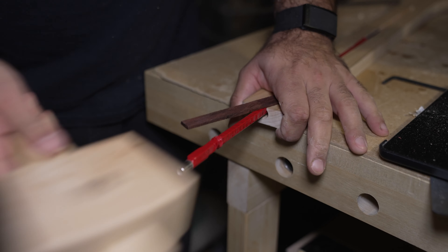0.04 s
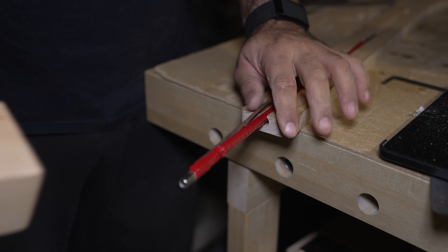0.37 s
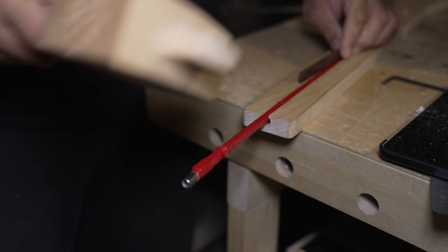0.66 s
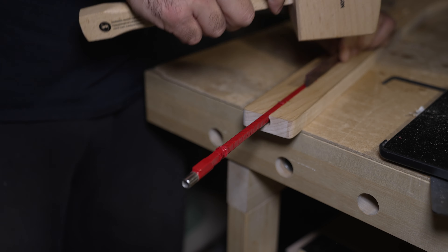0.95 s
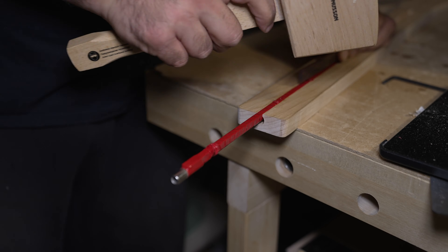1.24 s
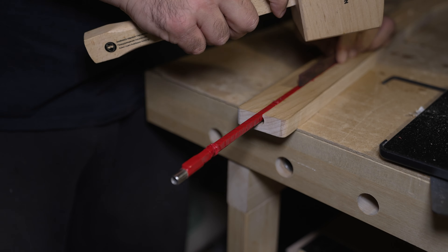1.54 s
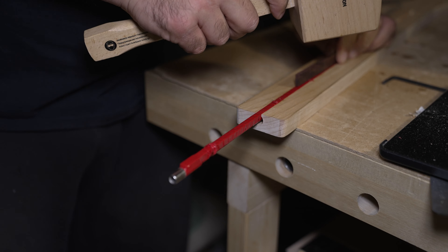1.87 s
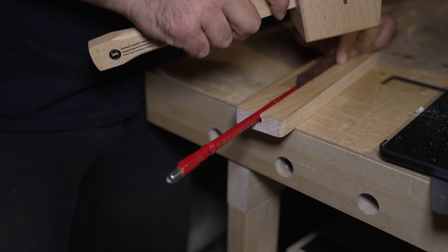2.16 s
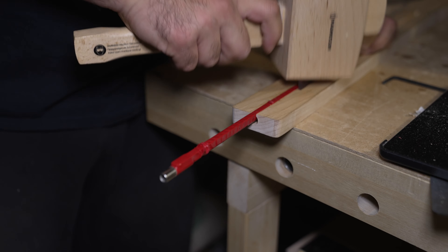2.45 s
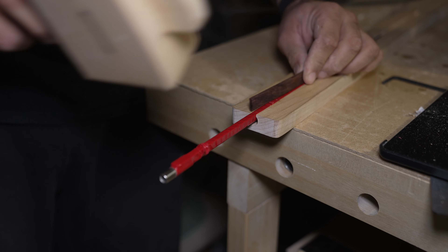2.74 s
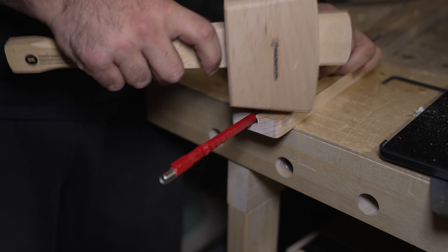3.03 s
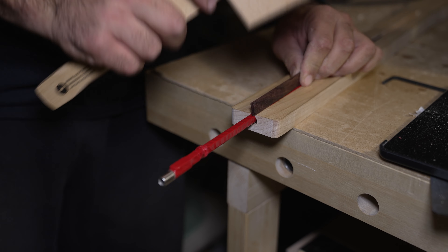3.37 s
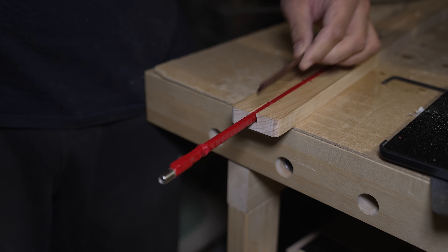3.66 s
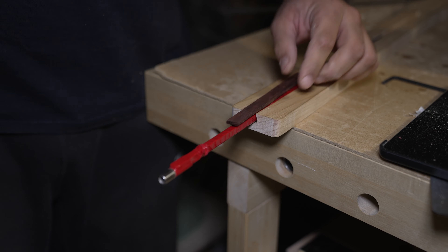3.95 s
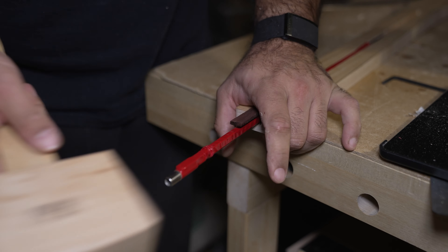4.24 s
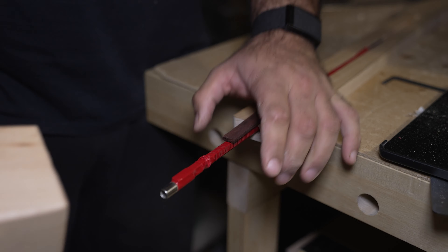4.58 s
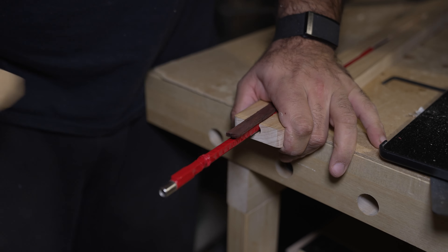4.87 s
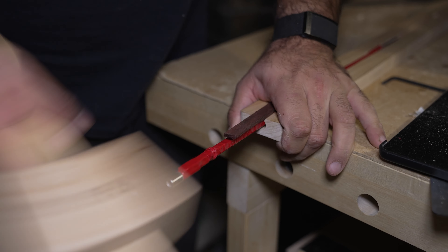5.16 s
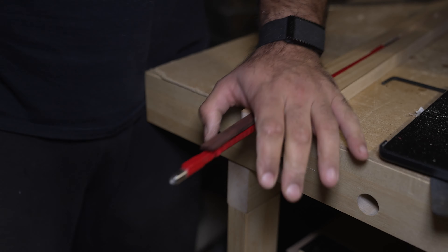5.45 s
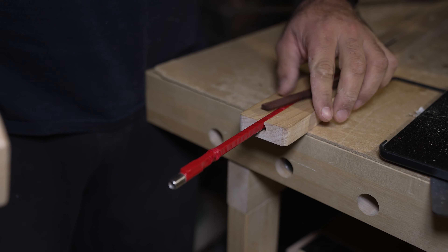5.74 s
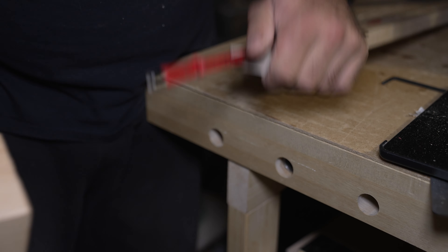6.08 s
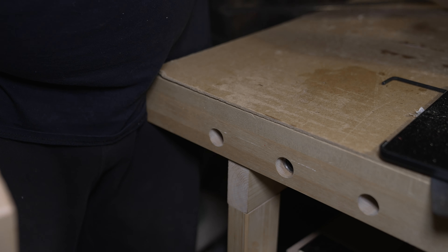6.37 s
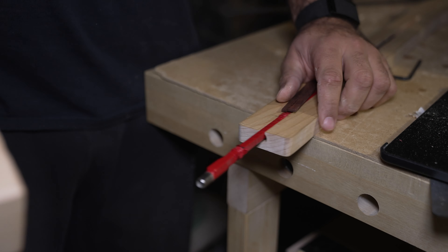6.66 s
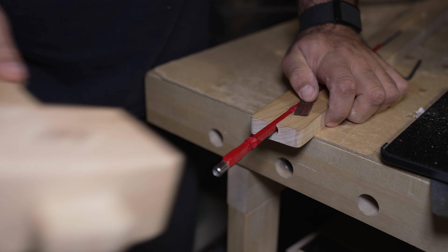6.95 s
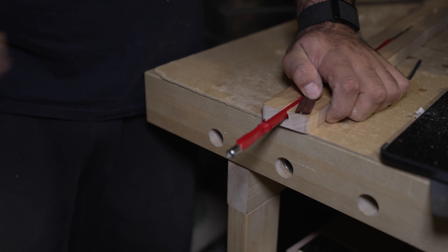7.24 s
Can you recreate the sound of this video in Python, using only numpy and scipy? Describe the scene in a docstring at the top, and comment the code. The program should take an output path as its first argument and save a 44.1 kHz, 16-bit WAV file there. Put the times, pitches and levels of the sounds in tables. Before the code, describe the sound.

A wooden mallet taps a metal rod into a wooden channel on a workbench, heard close in a small, fairly dry workshop. Each blow is a short wooden knock with a brief metallic ring. Four quick, light taps open the first quarter second. From 1 second come duller downward blows that thump the bench: a soft landing and three taps, two faint thuds near 1.7 and 2 seconds, another landing and four taps around 2.4, and five lighter taps around 3.3. Three taps follow near 4.3 seconds, then a fast, brighter run from 4.8 to 5.4, with the rod's ring sinking slightly in pitch. After a pause, a faint dull bump at 6.8 seconds leads into three heavier hits, ending around 7.3. A fan-like hum rises over the first two seconds and holds, while the stereo image sways throughout.

```python
"""A wooden mallet taps a metal rod into a wooden channel on a workbench.
Each blow thumps the bench, knocks the wood and makes the rod ring.
Four light taps open; from 1 s the mallet comes from above, with soft landings among the taps.
From 4.3 s it swings along the rod, and one rod mode sinks in pitch. A dull bump at 6.8 s leads into
three heavier hits. A workshop hum rises over 2 s and holds; the stereo image sways throughout."""
import sys
import numpy as np
from scipy import signal
from scipy.fft import rfft, irfft, next_fast_len
from scipy.io import wavfile
from scipy.ndimage import uniform_filter1d

SR = 44100
rng = np.random.default_rng(int(sys.argv[2]) if len(sys.argv) > 2 else 0)


def unload_wav(signal):
    """Save mono or channel-first audio to the path in sys.argv[1] as 16-bit WAV at rate SR, clipped to [-1, 1]."""
    wavfile.write(
        sys.argv[1],
        SR,
        np.round(np.clip(np.atleast_2d(signal).T, -1, 1) * 32767).astype(np.int16),
    )


N = 326781

# modes of channel, mallet head, rod and contact crack: (frequency [Hz], width [Hz], gain [dB])
CHANNEL_MODES = [(156.5, 62, -6.5), (225.4, 58, -3.5), (325, 65, -3), (451, 47, 1.5), (524, 98, -1),
                 (690, 114, -0.5)]
MALLET_MODES = [(884, 123, -1.5), (1080, 79, -5.5), (1122, 235, -2.5), (1370, 277, -2), (1580, 104, -4.5),
                (1875, 240, -4.5), (2250, 1700, -11.5)]
ROD_MODES = [(3033, 310, -1), (3543, 260, 5), (3870, 155, 4), (4400, 730, -3.5)]
CRACK_MODES = [(5370, 1400, 24), (7244, 41, -16), (7400, 2700, 2.5), (11000, 60, -7), (11600, 6900, -22)]


def mallet():
    """All taps and soft landings, each placed by its peak."""
    # (time [s], strength [dB], hardness [dB], swell [s], mode favoured by the strike point [Hz])
    taps = [(0.0, -38, 7, 0.004, 1340), (0.0681, -31, 7, 0.0043, 1320), (0.1443, -30.5, 5, 0.0055, 1190),
            (.22, -31, 3, 0.0057, 1100), (1.1041, -25, -4.5, .005, 1810), (1.1581, -21.5, -6.5, .0067, 437),
            (1.2147, -23.5, -3, 0.0073, 1940), (2.3363, -25, -5, 0.0052, 430),
            (2.394, -25.5, -8, 0.0058, 470), (2.4468, -22.5, -3.5, 0.0056, 440),
            (2.4957, -20, -2.5, 0.0056, 690), (3.161, -32, -3, 0.0061, 715), (3.2395, -28, 3, 0.0043, 1850),
            (3.3161, -28, 2, 0.0074, 900), (3.375, -27.5, 1.5, 0.0035, 1740), (3.449, -31, -1, 0.0035, 606),
            (4.2612, -32, -4, 0.0047, 870), (4.3598, -24.5, -5.5, 0.0025, 1330),
            (4.4643, -28.5, -2.5, 0.0042, 860), (4.836, -27.5, -1, 0.0046, 690),
            (4.943, -25, -0.5, 0.0039, 990), (5.0366, -26.5, -4, 0.0039, 510),
            (5.127, -26.5, 4.5, 0.0056, 900), (5.211, -23, 4, 0.0044, 1630),
            (5.3035, -25, 3.5, 0.004, 1370), (5.391, -25, 1.5, 0.0041, 1140), (5.436, -64, 23, 0.003, 1390),
            (6.9458, -21.5, -1, 0.0038, 1173), (7.123, -22, 8.5, 0.0049, 1270),
            (7.3158, -21.5, -0.5, 0.0046, 1124)]
    # (time [s], knock [dB], bench thump [dB])
    landings = [(1.036, -35.5, -24), (1.6575, -36, -37.5), (2.0422, -38.5, -36.5), (2.2712, -31, -21),
                (3.082, -45, -45)]
    lead = SR // 25
    t = np.arange(-lead, SR // 4) / SR
    gain = np.sqrt(0.05 * SR / len(t))  # refers each blow's rms to 50 ms
    blows = [(time_s, tap(t, time_s, *row)) for time_s, *row in taps]
    blows += [(time_s, soft_landing(t, *row)) for time_s, *row in landings]
    out = np.zeros(N + SR)
    for time_s, blow in blows:
        out[round(time_s * SR):][:len(t)] += gain * blow
    return out[lead:lead + N]


def tap(t, time_s, strength_db, hardness_db, swell_s, spot_hz):
    """A tap sounds bench, channel, mallet head and rod; a hard one knocks less, rings and cracks more."""
    downward = 1 < time_s < 3.6  # otherwise along the rod, hardly shaking the bench
    t60_s = 0.086 if downward else 0.078
    knock_db = strength_db - 0.92 - 0.66 * hardness_db
    thump_db = knock_db + (0 if downward else -14)
    clack_db = strength_db - 0.54 + 0.091 * hardness_db
    ring_db = strength_db - 4 + 0.34 * hardness_db
    crack_db = strength_db - 19 + hardness_db + (3 if downward else 0)
    spot_db = strength_db - 3.5 + 0.92 * max(strength_db + 25.5, 0)  # stands out in strong taps
    spot_mode = [(spot_hz, 0.12 * spot_hz, 0)]
    blow = amp(thump_db) * bench(t, swell_s)
    blow += amp(knock_db) * blurred_ring(t, CHANNEL_MODES, 1600, swell_s * 1.17, t60_s, snap=0.13)
    blow += amp(clack_db) * blurred_ring(t, MALLET_MODES, 4000, swell_s * 1.13, t60_s * 1.045, snap=0.27)
    blow += amp(spot_db) * blurred_ring(t, spot_mode, 2.8 * spot_hz, swell_s, t60_s * 1.01, snap=0.22)
    blow += amp(ring_db) * blurred_ring(t, rod_modes(time_s, downward), 6200, swell_s, 0.082, snap=0.063)
    blow += amp(crack_db) * blurred_ring(t, CRACK_MODES, 38000, swell_s * 1.17, t60_s * 0.88, snap=0.1)
    return blow


def rod_modes(time_s, downward):
    """The rod gains lower modes when struck down into its groove, and a sinking one as it goes in."""
    # (frequency [Hz], width [Hz], gain [dB])
    pressed_modes = [(2150, 940, -3.5), (2810, 300, 0)]
    # sinking mode: (time [s], frequency [Hz])
    sink = [(4.3, 2330), (5.08, 2270), (5.21, 2125), (5.43, 1990)]
    sink_s, sink_hz = np.transpose(sink)
    width_hz, gain_db = 77, 3
    if downward:
        return pressed_modes + ROD_MODES
    if sink_s[0] < time_s < sink_s[-1]:
        return ROD_MODES + [(np.interp(time_s, sink_s, sink_hz), width_hz, gain_db)]
    return ROD_MODES


def soft_landing(t, knock_db, thump_db):
    """A soft landing shakes the bench and knocks low in the wood; the rod only stirs."""
    swell_s, thud_hz, width_hz = 0.0068, 336, 110

    def ring(modes, cutoff_hz):
        return blurred_ring(t, modes, cutoff_hz, swell_s, t60_s=0.12, snap=0.14)

    wood = amp(-1) * ring(CHANNEL_MODES, 620)
    wood += amp(3.5) * ring([(thud_hz, width_hz, 0)], 740)
    wood += amp(-5) * ring(MALLET_MODES, 5700)
    thump = amp(thump_db) * bench(t, swell_s)
    rod = amp(-8) * ring(ROD_MODES, 10000)
    crack = amp(-15.5) * ring(CRACK_MODES, 38000)
    return thump + amp(knock_db) * (wood + rod + crack)


def blurred_ring(t, modes, cutoff_hz, swell_s, t60_s, snap):
    """A short blurred burst of ringing noise swells to a sharp peak at t = 0 and dies away."""
    def body(hz):  # the contact is too soft to drive modes far above the cutoff
        return resonances(modes, hz) / (1 + 1j * hz / cutoff_hz) ** 3

    rise = np.exp(-(np.maximum(-t, 0) / swell_s) ** 1.11)
    decay = amp(-60 * np.maximum(t, 0) / t60_s)
    noise_burst = rise * decay * filtered(rng.standard_normal(len(t)), body)
    contact = filtered(1.0 * (t == 0), body)
    return unit(unit(noise_burst) + snap * unit(contact))


def bench(t, swell_s):
    """The bench swings as soon as the mallet touches, ahead of the blow's peak."""
    return bench_mode(t + swell_s + 0.0015, hz=88.1, attack_s=0.0045, t60_s=0.13)


def bench_mode(t, hz, attack_s, t60_s):
    """The bench top gives under a push and swings in one low mode."""
    age_s = np.maximum(t, 0)
    detune = 1 + 0.004 * rng.standard_normal()
    swing = np.sin(2 * np.pi * hz * detune * age_s)
    rise = (1 - np.exp(-age_s / attack_s)) ** 2
    return unit(swing * rise * amp(-60 * age_s / t60_s))


def bump():
    """A dull push on the bench before the last three hits."""
    start_s = 6.812
    push = bench_mode(np.arange(SR // 4) / SR, hz=53, attack_s=0.018, t60_s=0.091)
    return amp(-44) * np.pad(push, (round(start_s * SR), N))[:N]


def room_tail(x):
    """The small workshop's short reverberation, longest in the bass."""
    # room decay: (frequency [Hz], t60 [s])
    decay = [(90, 0.36), (400, 0.08), (3500, 0.071), (12000, 0.12)]
    hz, t, noise = signal.stft(rng.standard_normal(SR // 2), SR, nperseg=256)
    t60_s = log_interp(decay, hz)[:, None]
    _, tail = signal.istft(noise * amp(-60 * t / t60_s), SR, nperseg=256)
    return signal.fftconvolve(x, tail / np.linalg.norm(tail))[:N]


def hum():
    """Rushing air, as from a fan, with a few resonances; part of it reaches each ear separately."""
    # (time [s], level [dB])
    levels = [(0, -51), (.4, -49.5), (2.1, -42), (5.2, -43.5), (7.4, -41.5)]
    # broadband spectrum: (frequency [Hz], gain [dB])
    spectrum = [(20, -3), (65, 0), (130, 1), (165, -4.5), (310, -10), (480, -5), (760, -11), (1500, -18),
                (2300, -17.5), (3800, -20.5), (5200, -31.5), (7500, -37), (12000, -44.5), (15500, -64)]
    # (frequency [Hz], width [Hz], gain [dB])
    modes = [(214.5, 15.4, 4.5), (372, 11.4, 0.5), (481, 47, -3), (900, 68, -1.5), (1067, 54, -3.5),
             (1370, 108, 0), (2045, 24, -8)]
    level_db = np.interp(np.arange(N) / SR, *np.transpose(levels))
    air = rng.standard_normal(N) + amp(-19.5) * rng.standard_normal((2, N))
    air = filtered(air, lambda hz: np.hypot(amp(log_interp(spectrum, hz)), abs(resonances(modes, hz))))
    return amp(level_db) * unit(air)


def sway(stereo):
    """Both ears get the same level, but the phase between them drifts, most at random in the treble."""
    # phase by register: (time [s], left lead [rad])
    bass = [(1.55, 1.8), (1.8, 0.66), (4.84, 0.3), (4.94, -2), (6.25, -1.5), (6.55, -3.5), (6.63, 0),
            (7, -0.5), (7.15, 2.5)]
    low_mid = [(1.3, 1.96), (1.65, 1.1), (1.8, -1.16), (2.38, -2.5), (2.52, -0.5), (4.84, 1), (4.94, -1.93),
               (5.75, -1.93), (6.27, -3), (6.34, -1.8), (6.6, 0.5), (6.95, 0), (7.12, 2)]
    high_mid = [(1.15, 2), (1.65, 0.6), (2.38, -1), (3.5, 0.53), (4.3, -2), (4.84, -2), (6, -3),
                (6.55, -3.5), (6.63, -0.65), (7.3, -1.54)]
    # random drift: (frequency [Hz], rms phase [rad])
    scatter = [(150, 0.19), (600, 0.15), (1400, 0.41), (3600, 1.55), (8000, 2.22)]
    edges_hz, treble_lead_rad = np.array([265, 1020, 2600]), 0.73
    hz, t, (left, right) = signal.stft(stereo, SR, nperseg=1024)
    leads_rad = [np.interp(t, *np.transpose(curve)) for curve in (bass, low_mid, high_mid)]
    leads_rad.append(np.full(len(t), treble_lead_rad))
    handover = 1 / (1 + (edges_hz / (hz[:, None] + 1)) ** 10)
    phase_rad = leads_rad[0] + handover @ np.diff(leads_rad, axis=0)
    phase_rad += log_interp(scatter, hz)[:, None] * smooth_field(left.shape, size=(9, 11))
    shifted = np.array([left * np.exp(0.5j * phase_rad), right * np.exp(-0.5j * phase_rad)])
    return signal.istft(shifted, SR, nperseg=1024)[1][:, :N]


def smooth_field(shape, size):
    """Smooth random field of rms 1 over frequency and time."""
    field = rng.standard_normal(shape)
    for axis in (0, 1, 0, 1):
        field = uniform_filter1d(field, size[axis], axis)
    return unit(field)


def resonances(modes, hz):
    """Causal response of a set of modes, summed with alternating sign."""
    return sum((-1) ** k * amp(db) * 1j * hz * width_hz / (mode_hz ** 2 - hz ** 2 + 1j * hz * width_hz)
               for k, (mode_hz, width_hz, db) in enumerate(modes))


def filtered(x, response):
    """Apply a complex frequency response."""
    n = x.shape[-1]
    n_fft = next_fast_len(n + 4096)
    return irfft(rfft(x, n_fft) * response(np.fft.rfftfreq(n_fft, 1 / SR)), n_fft)[..., :n]


def log_interp(points, hz):
    """Interpolate (frequency [Hz], value) points on a log axis."""
    points_hz, values = np.transpose(points)
    return np.interp(np.log(hz + 1), np.log(points_hz + 1), values)


def amp(db):
    """Decibels to gain."""
    return 10 ** (np.asarray(db) / 20)


def unit(x):
    """Scale to rms 1."""
    return x / np.sqrt(np.mean(x ** 2) + 1e-20)


def scene():
    """Close blows, a little room and the hum, all swaying together."""
    blows = mallet() + bump()
    room = np.array([room_tail(blows), room_tail(blows)])
    return sway(amp(-1) * blows + amp(-29) * room + hum())


def record(dry):
    """Cut the deepest bass, round the highest peaks and limit the band."""
    low_hz, top_hz, ceiling = 18, 15800, 0.9
    x = filtered(dry, lambda hz: (1j * hz / (low_hz + 1j * hz)) ** 2)
    x = x / (1 + abs(x / ceiling) ** 6) ** (1 / 6)
    return filtered(x, lambda hz: hz < top_hz)


dry = scene()
out = record(dry)
unload_wav(out)
```